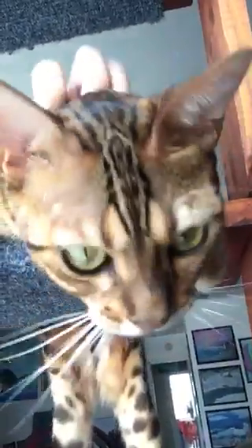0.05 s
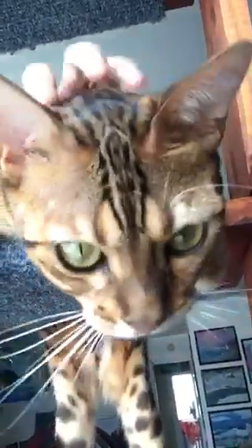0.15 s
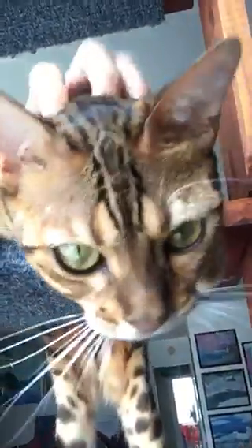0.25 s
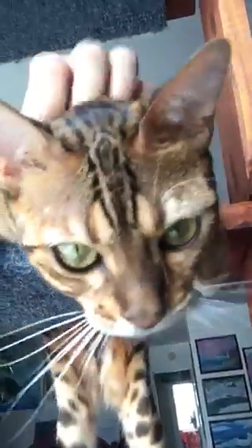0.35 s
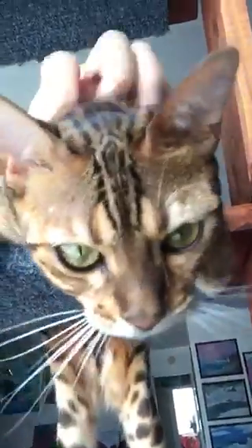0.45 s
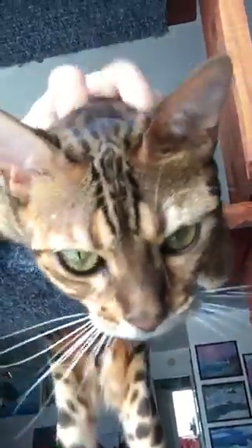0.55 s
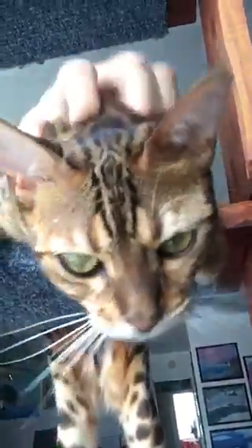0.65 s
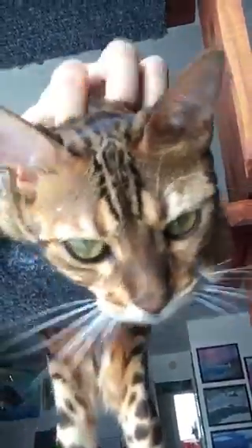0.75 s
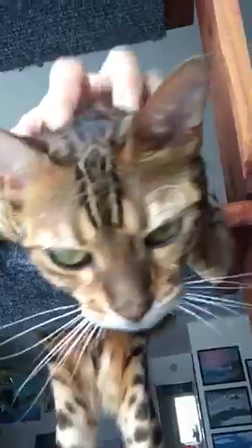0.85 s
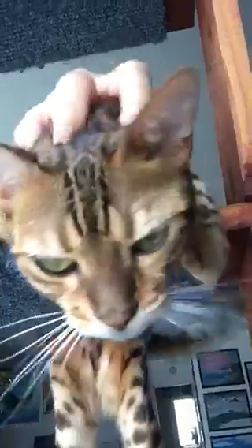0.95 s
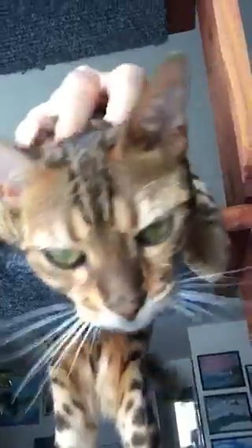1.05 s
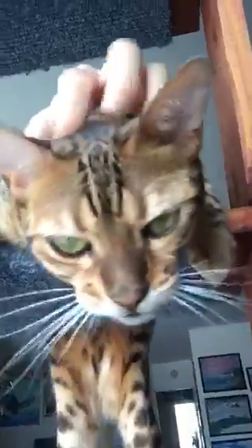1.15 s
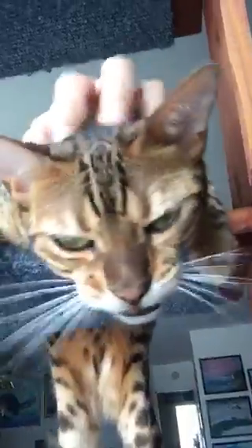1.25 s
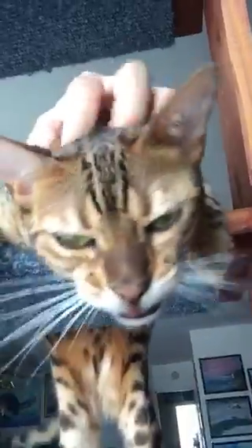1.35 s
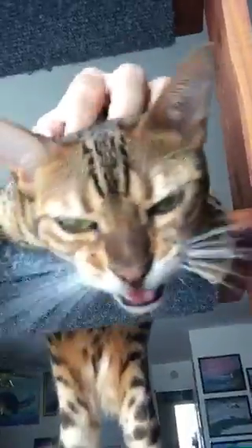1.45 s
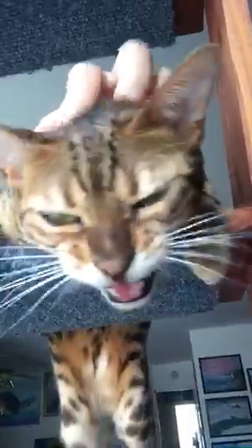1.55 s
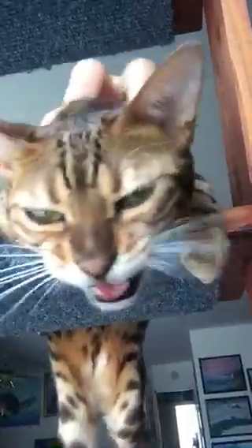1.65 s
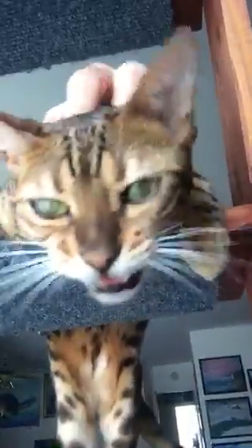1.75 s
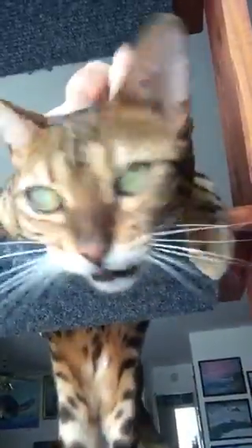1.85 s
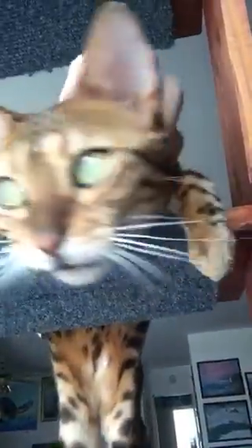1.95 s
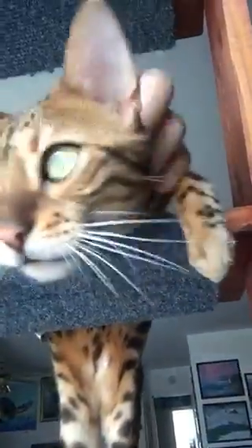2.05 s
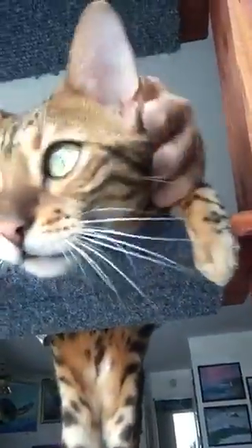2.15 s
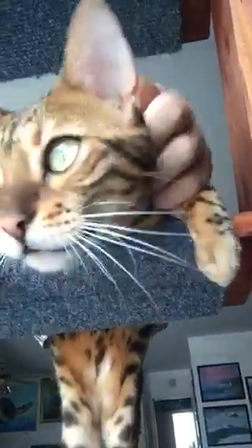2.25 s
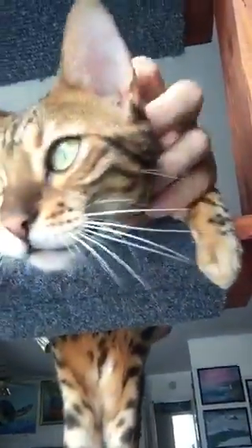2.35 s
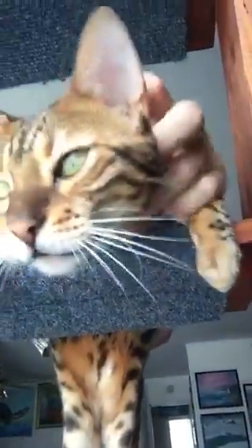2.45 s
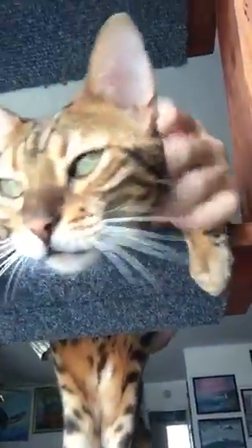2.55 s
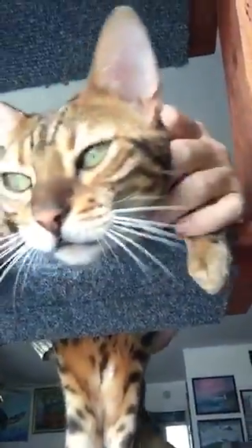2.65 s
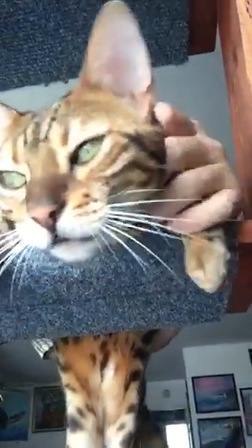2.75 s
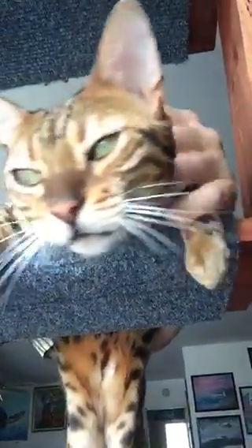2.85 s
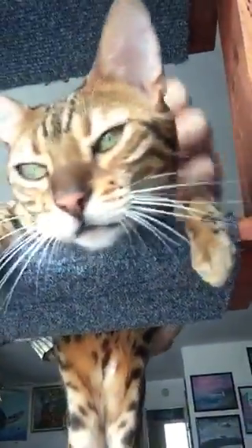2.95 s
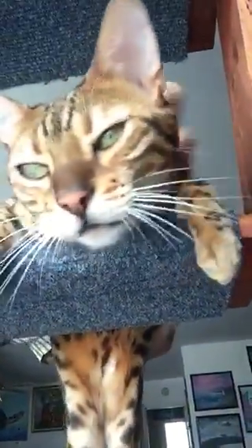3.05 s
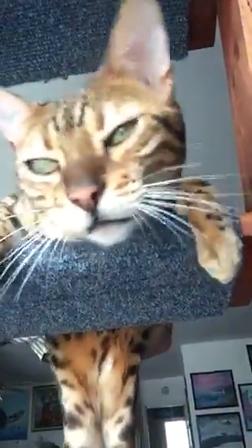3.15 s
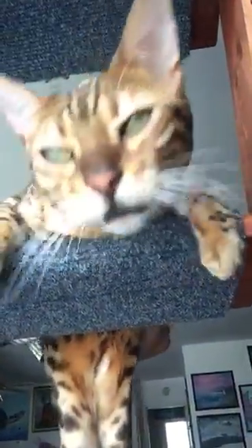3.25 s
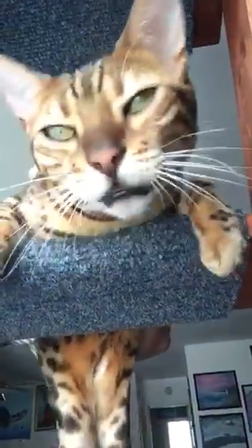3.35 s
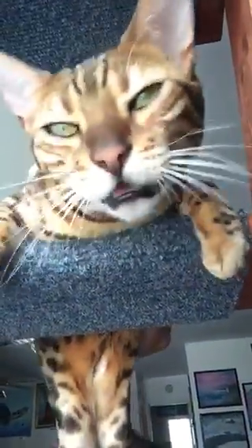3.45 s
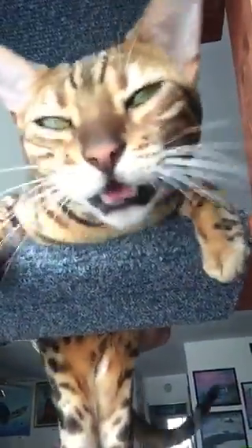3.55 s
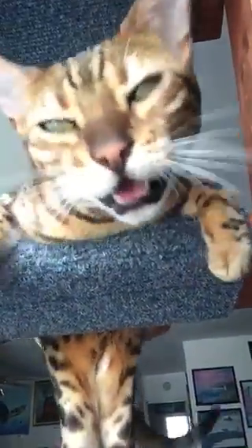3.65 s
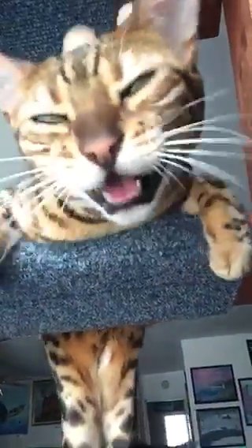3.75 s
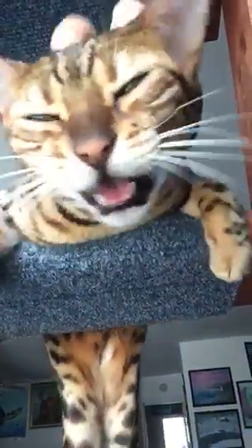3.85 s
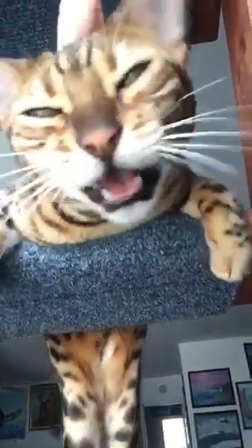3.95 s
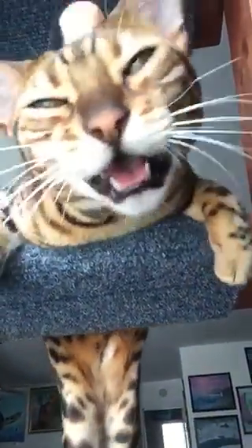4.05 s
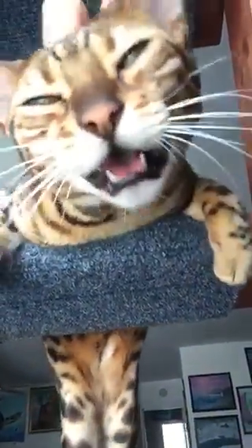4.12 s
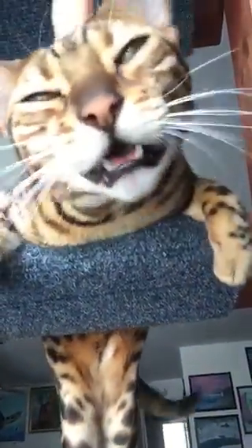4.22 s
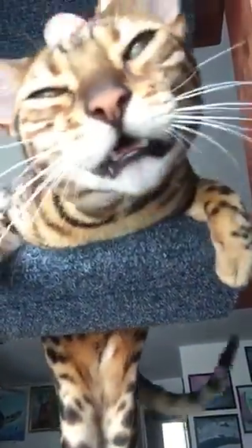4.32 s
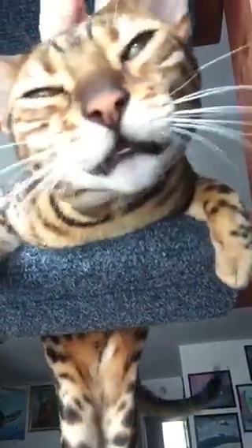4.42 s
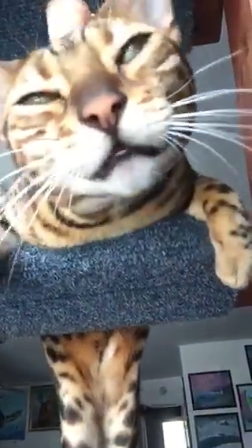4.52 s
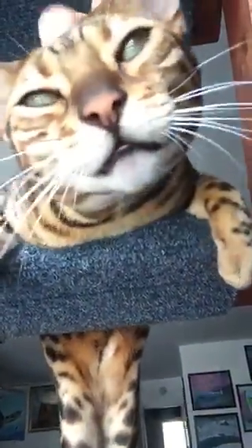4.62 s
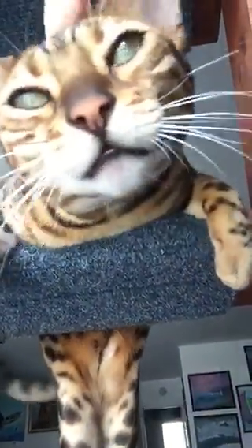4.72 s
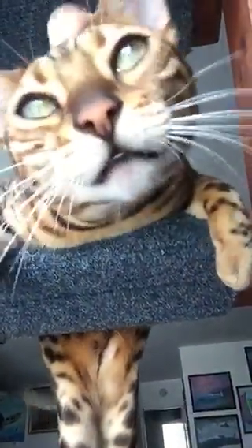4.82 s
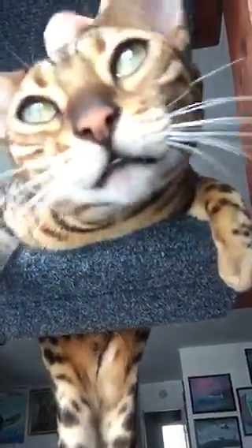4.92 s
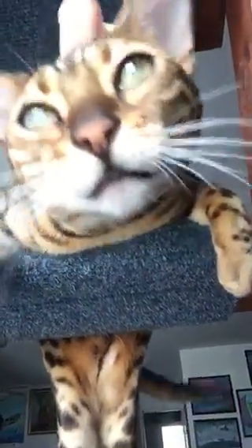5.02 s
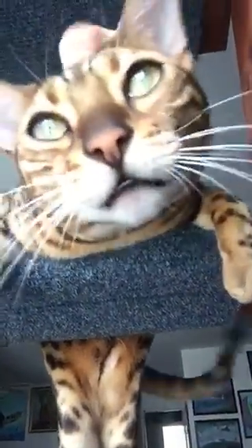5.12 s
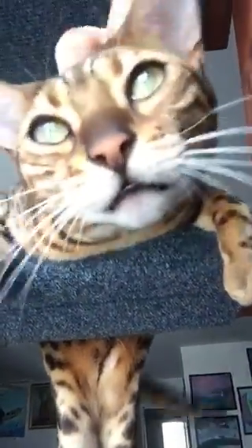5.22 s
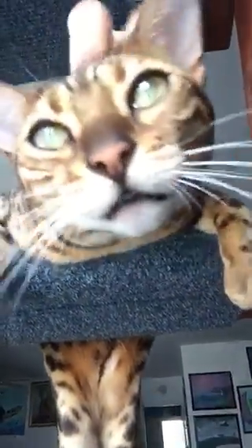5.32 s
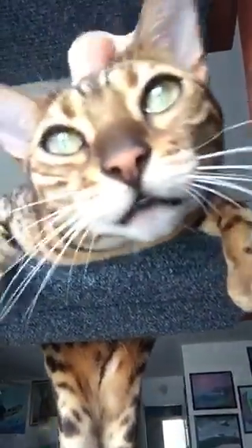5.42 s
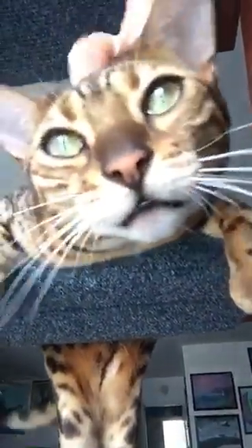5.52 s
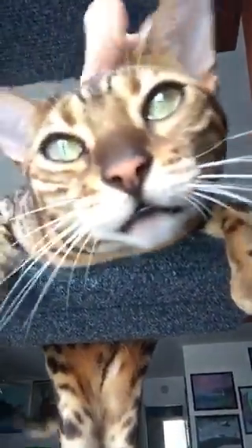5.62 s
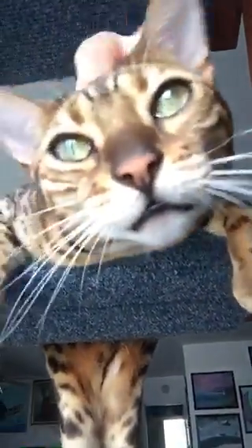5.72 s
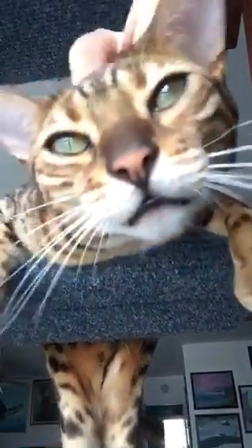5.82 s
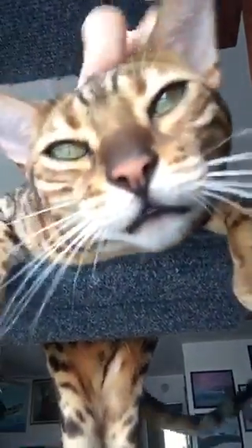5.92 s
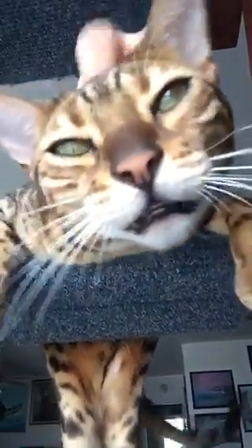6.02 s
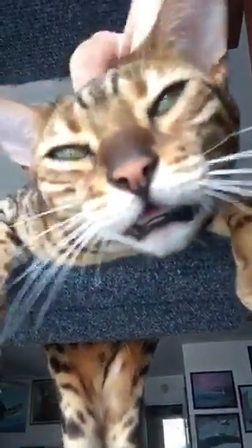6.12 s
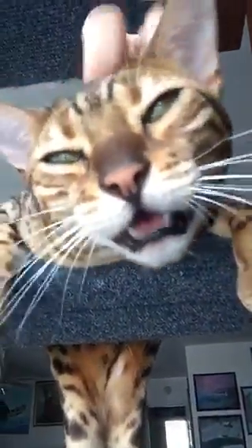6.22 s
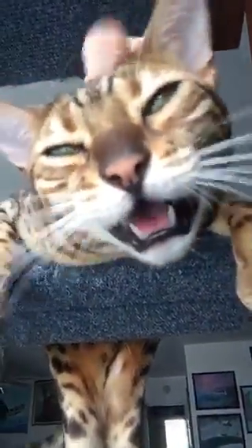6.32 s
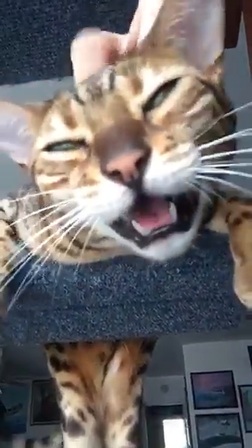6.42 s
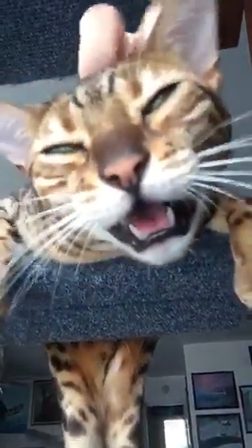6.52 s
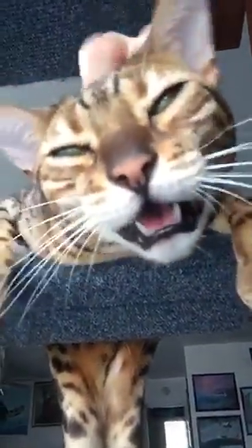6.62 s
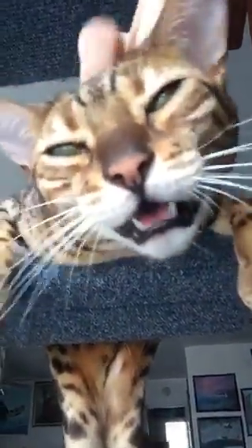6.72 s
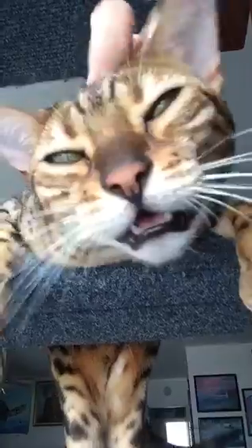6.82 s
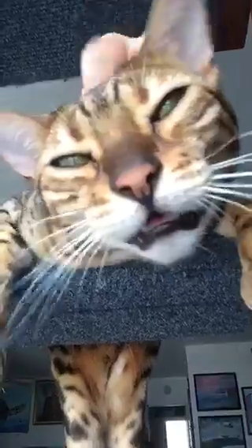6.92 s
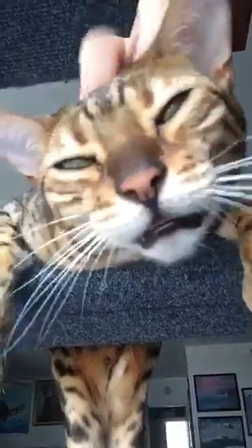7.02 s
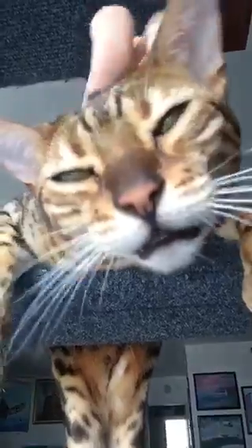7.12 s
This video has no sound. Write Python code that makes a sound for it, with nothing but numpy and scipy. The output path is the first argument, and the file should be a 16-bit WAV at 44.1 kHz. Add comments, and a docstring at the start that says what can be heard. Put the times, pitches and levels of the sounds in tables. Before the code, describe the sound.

Soft scratching and fur rubbing, then three close cat calls, each a purring trill opening into a meow and ending in a short nasal hum.

```python
"""Fingers scratch lightly on a cat's crown, then rub its fur until about three seconds in.
The cat, close by in a small room, calls three times. Each call starts as a purring trill through
the nose and opens into a two-syllable meow that creaks as its pitch sinks. It closes with a short
hum and nostril air; a thin squeak ends the first call, single flaps and wet sputter the others.
Tongue and lip clicks are bursts of noise; throughout, a far-off appliance drones over a faint hiss."""
import sys
import numpy as np
from scipy import signal
from scipy.fft import rfft, irfft
from scipy.io import wavfile
from scipy.ndimage import uniform_filter1d

SR = 44100
rng = np.random.default_rng(int(sys.argv[2]) if len(sys.argv) > 2 else 0)


def master(y):
    """Save y as 16-bit WAV."""
    cut = np.clip(np.atleast_2d(y).T, -1, 1)
    pcm = np.round(cut * 32767)  # scale
    wavfile.write(sys.argv[1], SR, pcm.astype(np.int16))


N = 316197
TAPS = 1024  # length of the sound that one closure of the vocal folds makes, in samples
BINS = np.fft.rfftfreq(TAPS, 1 / SR)  # Hz
TIME = np.arange(N) / SR  # seconds

# Resonances of the nose, in trills and behind the meows. Each row: frequency in Hz, relative level in dB.
TRILL_NOSE = [(60, -23.5), (170, 6.5), (300, 1.5), (550, 7.5), (760, -15), (1000, 4.5), (1250, 3.5),
              (1700, -0.5), (2050, -15.5), (2500, -9), (3000, -17.5), (3600, -16.5), (4300, -36),
              (9000, -53)]
# Colour of air hissing in the nostrils. Each row: frequency in Hz, relative level in dB.
NOSTRIL_AIR = [(2500, -7), (3500, -3.5), (4600, -17), (5500, -13), (6700, 3), (7600, -9.5), (9000, -18.5),
               (14500, -38)]


def amp(db):
    """Turns decibels into gain."""
    return 10 ** (np.asarray(db) / 20)


def unit(x):
    """Scales a signal to an rms of 1."""
    return x / np.sqrt(np.mean(x ** 2) + 1e-20)


def read(points, hz):
    """Reads a spectrum in dB, with its points joined by lines over log frequency."""
    f, db = np.transpose(points)
    return np.interp(np.log(hz + 1), np.log(f + 1), db)


def add(mix, s, sound):
    """Mixes a sound in at time s, in seconds."""
    part = mix[int(s * SR):][:len(sound)]
    part += sound[:len(part)]


def coloured(points, x=None):
    """Gives noise, or the given signal, a spectrum and an rms of 1."""
    x = rng.standard_normal(N) if x is None else x
    gain = amp(read(points, np.fft.rfftfreq(N, 1 / SR)))
    return unit(irfft(rfft(x) * gain, N))


def level(rows):
    """Gain over time from rows of seconds and dB, almost silent before and after them."""
    gain = amp(np.interp(TIME, *np.transpose(rows), left=-200, right=-200))
    return uniform_filter1d(gain, size=200)


def bursts_of(rows, attack_s, t60):
    """Gain of bursts that rise, hold, then fall by 60 dB in t60 seconds."""
    gain = np.zeros(N)
    for s, hold, db in rows:
        rise = np.clip((TIME - s) / attack_s, 0, 1)
        after = np.maximum(TIME - s - attack_s - hold, 0)
        gain += rise * amp(db - 60 * after / t60)
    return gain


def resonance(hz, width):
    """A bell-shaped peak of height 1 over the bins, one row a pulse."""
    return 1 / (1 + ((BINS - hz[:, None]) / (width / 2)) ** 2)


def above(hz):
    """A smooth step over the bins, from 0 below hz to 1 above it."""
    return 1 - 1 / (1 + (BINS / hz) ** 16)


def share(db, band, want_db):
    """Lifts or lowers one register of each pulse towards a wanted share of the energy above 350 Hz."""
    power = amp(db) ** 2 * (BINS > 350)
    have = (power * band).sum(1) / power.sum(1)
    want = np.minimum(amp(want_db) ** 2, .9)
    lift_db = 10 * np.log10(want * (1 - have) / (have * (1 - want)))
    return db + band * lift_db[:, None]


def closures(t, hz, rough, jitter=.2, shimmer_db=6.5):
    """Times, rates, sizes and roughness of the vocal folds' closures; rough folds slap unevenly."""
    turns = (np.cumsum(hz) - hz[0]) / SR
    at = np.interp(np.arange(int(turns[-1]) + 1), turns, t)  # one closure a turn
    late, strong = rng.standard_normal((2, len(at)))
    rate = np.interp(at, t, hz)
    rough = np.interp(at, t, np.clip(rough, 0, 1))
    size = amp(shimmer_db * rough * (np.clip(strong, -2, 2) - rough / 2))
    return np.array([at + jitter * rough * late / rate, rate, size, rough])


def voiced(pulses, effort_db, tract_db, air, rough_air, air_hz, puff_s):
    """Each closure and its puff of turbulent air ring the vocal tract as it is shaped at that moment."""
    at, rate, size, rough = pulses
    # Folding the cepstrum makes the tract causal: it rings only after the closure.
    cepstrum = irfft(np.log(amp(tract_db)), axis=1)
    cepstrum[:, 1:TAPS // 2] *= 2
    cepstrum[:, TAPS // 2 + 1:] = 0
    tract = np.exp(rfft(cepstrum, axis=1))

    decay = np.exp(-np.arange(TAPS) / SR / puff_s)
    noise = rng.standard_normal((len(at), TAPS))
    puff = rfft(noise * decay / np.linalg.norm(decay), axis=1)
    noisy = (air + rough_air * rough[:, None]) * (1 + (BINS / air_hz) ** 2)  # air against click
    ring = tract * (puff * noisy - 1) / np.sqrt(1 + noisy ** 2)

    energy = 2 * (abs(tract) ** 2 * (BINS > 350)).sum(1) / TAPS
    ring *= (size * amp(effort_db) * np.sqrt(SR / rate / energy))[:, None]
    part_sample = ((at * SR) % 1)[:, None]  # closures fall between samples
    ring *= np.exp(-2j * np.pi * BINS / SR * part_sample) * (1 - above(17000))
    out = np.zeros(N)
    for s, sound in zip(at, irfft(ring, axis=1)):
        add(out, s, sound)
    return out


def hum(pulses, effort_db, nose, edge_db, shift=1):
    """Pulses of the folds leave through the nose, whose resonances move by the factor shift."""
    tract = read(nose, BINS / shift) + np.zeros((pulses.shape[1], 1))  # one row a pulse
    tract = share(tract, above(1800), edge_db)
    return voiced(pulses, effort_db, tract, air=0.045, rough_air=0.81, air_hz=4000, puff_s=0.0076)


def meows():
    """Vocal folds ring the open mouth, whose resonances move; a little sound leaves by the nose."""
    # Pitch of the folds, one curve a syllable, two syllables a meow. Each row: time in seconds, pitch in Hz.
    pitches = [
        [(1.283, 305.6), (1.321, 332.4), (1.369, 299.7), (1.419, 291.4), (1.435, 315), (1.455, 278),
         (1.479, 257), (1.5, 239)],
        [(1.503, 227), (1.553, 323.5), (1.575, 326), (1.6, 287.6), (1.64, 204.6), (1.69, 186.8), (1.76, 211)],
        [(3.537, 286), (3.563, 313.6), (3.587, 288), (3.605, 291.7), (3.699, 267.8), (3.719, 284),
         (3.777, 299.3), (3.805, 272), (3.831, 299.3), (3.863, 282.3), (3.885, 288), (3.9, 271)],
        [(3.903, 228), (3.93, 184.3), (3.985, 224.3), (4.02, 204.6), (4.065, 301.7), (4.115, 367.4),
         (4.137, 373.4), (4.18, 346), (4.213, 281)],
        [(6.135, 188.8), (6.24, 183), (6.318, 194)],
        [(6.326, 219.5), (6.356, 255), (6.38, 275.4), (6.45, 309.6), (6.492, 314.9), (6.548, 310.3),
         (6.612, 296), (6.636, 278), (6.658, 250), (6.668, 233.5)],
    ]
    # Effort and mouth, one curve a syllable. Each row: time in seconds, effort in dB before the trim,
    # jaw opening 0-1, second resonance in Hz.
    mouths = [
        [(1.283, -36, 0.8, 1880), (1.297, -26.5, 0.26, 1910), (1.361, -36.5, 0.42, 1740),
         (1.425, -41.5, 1, 1750), (1.5, -56.5, 1, 1880)],
        [(1.535, -55, 1, 1870), (1.548, -43, 0.84, 1900), (1.572, -42.5, 1, 1950), (1.6, -50, 1, 1930),
         (1.73, -46.5, 0.73, 1880), (1.748, -45.5, 0.54, 1820)],
        [(3.537, -32, 0.04, 1920), (3.59, -30.5, 0.1, 1800), (3.695, -38, 0.28, 1700), (3.727, -34.5, 0, 1730),
         (3.793, -36.5, 0.84, 1820), (3.885, -36.5, 0.76, 1900)],
        [(3.9, -42.5, 0.8, 1900), (3.928, -43, 0.4, 1970), (4.042, -38.5, 0.54, 1910), (4.094, -31, 0.4, 1920),
         (4.15, -29, 0, 1860), (4.2, -36, 0.34, 1905), (4.213, -42, 0.1, 1950)],
        [(6.135, -37.5, 0.23, 1940), (6.148, -39, 0.07, 1970), (6.255, -37, 0.2, 1880), (6.287, -39, 0.1, 1980),
         (6.311, -39.5, 0.2, 2010)],
        [(6.326, -31.5, 0.38, 1820), (6.413, -29.5, 0.35, 1870), (6.481, -35.5, 0.36, 1750),
         (6.537, -36, 0.4, 1680), (6.645, -36, 0.69, 1935), (6.668, -45.5, 0.2, 2000)],
    ]
    # Voice quality, one row a syllable. Each row: roughness added at creaking pitch 0-1,
    # chest share at usual effort in dB, edge (treble) share with the jaw shut in dB before the pinch,
    # lift or cut of the edge by the final pinch in dB, level through the nose against effort in dB.
    voices = [(.8, -13, -23, -6.5, -27), (0.57, -12.5, -24, 8.5, -18), (0.6, -11.5, -21.5, 2.5, -33.5),
              (0.17, -12, -20, 14, -29), (0.2, -20, -12.5, -14, -6), (0.2, -9, -23.5, 14, -44)]
    # Open mouth without its moving resonances. Each row: frequency in Hz, relative level in dB.
    mouth_colour = [(100, -30), (300, -7.5), (520, -10), (900, 3), (1250, -1.5), (1800, -7.5), (2900, -9),
                    (3500, -6), (4200, -13), (5200, -18.5), (6600, -24.5), (7700, -39.5), (8900, -39),
                    (10500, -67.5)]
    clean_hz, creak_hz, clean_rough = 270, 199.6, 0.032  # folds close evenly high up, creak as pitch sinks
    third_hz, third_rise_hz = 2472, 500  # the third resonance, and its rise as the jaw drops
    jaw_edge_db, jaw_blur = 14, 0.083  # an open jaw lets out more treble and flattens the resonances
    strain_hz, strain_span_hz = 325, 80  # above this pitch they flatten further
    usual_effort_db, chest_per_db = -35, 0.36  # a softer voice has more chest
    pinch_s = 0.064  # the throat tightens and changes the treble towards the end of each syllable
    trim_db = 0.05
    out = np.zeros(N)
    for pitch, mouth, (creak, chest_db, edge_db, pinch_db, nose_db) in zip(pitches, mouths, voices):
        t = np.arange(pitch[0][0], pitch[-1][0], 1 / SR)
        hz = np.interp(t, *np.transpose(pitch))
        rough = clean_rough + creak * np.maximum(clean_hz - hz, 0) / (clean_hz - creak_hz)
        pulses = closures(t, hz, rough)
        at, rate = pulses[:2]
        s, *columns = np.transpose(mouth)
        effort, jaw, second = (np.interp(at, s, c) for c in columns)
        third = third_hz + third_rise_hz * jaw

        strain = np.maximum(rate - strain_hz, 0) / strain_span_hz
        focus = np.clip(1 - jaw_blur * jaw - strain, 0, 1)  # sharpness of the resonances
        chest = chest_db - chest_per_db * (effort - usual_effort_db)
        pinch = pinch_db * np.exp((at - t[-1]) / pinch_s)
        edge = edge_db + jaw_edge_db * jaw + pinch

        peaks = 9 * resonance(second, 450) + 11 * resonance(third, 360)  # dB
        peaks -= 5 * resonance(second * .66, 520)  # a hollow opens below the second resonance
        tract = read(mouth_colour, BINS) + focus[:, None] * peaks
        tract -= 9 * resonance(third + 900, 380)  # and another above the third
        tract += 5 * resonance(second * 2.6, 600)  # a fourth resonance follows the second
        tract = share(tract, 1 - above(1400), chest)
        tract = share(tract, above(3160), edge)
        out += voiced(pulses, effort + trim_db, tract, air=0.051, rough_air=1.0, air_hz=2240, puff_s=0.0017)
        out += hum(pulses, effort + nose_db, TRILL_NOSE, edge_db=-10)
    return out


def trills():
    """A hum climbs in pitch and level; a purr chops it, and the air in the nostrils, into throbs."""
    # Mouth shut, before each meow. Each row: start in seconds, length in seconds, first and last pitch
    # in Hz, first and last level in dB before the trim, release in seconds, purr throbs per second,
    # first and last purr depth 0-1, edge (treble) share in dB, nostril air in dB before throb and fade.
    trill_rows = [(1.12, 0.16, 150.6, 196.4, -48, -38.5, 0.067, 30, 0.66, 0.1, -8.5, -81),
                  (3.109, 0.42, 95.8, 214.9, -57, -36.5, 0.0015, 36, 0.4, 0.2, -7.5, -75),
                  (5.802, .328, 114.8, 185.4, -51.5, -39.5, 0.0023, 28.9, 0.46, 0.63, -11, -68.5)]
    swell_power = 0.43  # a trill swells fast at first
    first_rough, last_rough = 0.9, 0.32
    top_hz, top_sink = 3000, 0.16  # above this, the nose's resonances sink by this share of their frequency
    trim_db = -4.5
    out, air = np.zeros(N), np.zeros(N)
    for (start, length, first_hz, last_hz, first_db, last_db, release, purr_rate,
         first_depth, last_depth, edge_db, air_db) in trill_rows:
        t = np.arange(0, length, 1 / SR)
        u = t / length  # progress 0-1
        depth = np.clip(first_depth + (last_depth - first_depth) * u, 0, .95)
        throb = 1 + depth * np.sin(2 * np.pi * purr_rate * t)
        throb /= np.sqrt(1 + depth ** 2 / 2)  # keeps the energy the same at any depth
        gain = throb * np.minimum((length - t) / release, 1)
        effort = first_db + (last_db - first_db) * u ** swell_power + 20 * np.log10(gain + 1e-6)

        hz = first_hz + (last_hz - first_hz) * u
        rough = first_rough + (last_rough - first_rough) * u
        pulses = closures(start + t, hz, rough, shimmer_db=2.5)
        progress = (pulses[0, :, None] - start) / length
        shift = 1 + top_sink * (.5 - progress) * above(top_hz)
        pulse_effort = np.interp(pulses[0], start + t, effort) + trim_db
        out += hum(pulses, pulse_effort, TRILL_NOSE, edge_db, shift)
        add(air, start, amp(air_db) * gain * np.sqrt(1 - u))
    return out + air * coloured(NOSTRIL_AIR)


def endings():
    """With the mouth shut, a short hum sags and turns rough; single flaps of the folds end two calls."""
    # Hum after each meow. Each row: start in seconds, length in seconds, pitch in Hz before the sag,
    # level in dB before sag and trim, attack in seconds, first roughness 0-1, edge (treble) share in dB,
    # sag of the nose's resonances 0-1.
    hum_rows = [(1.811, 0.036, 201.7, -38.5, 0.00086, .55, -2, 0.05),
                (4.219, 0.11, 333.4, -38.5, 0.013, .5, -9, 0.17),
                (6.691, .15, 295, -33.5, 0.018, 0.09, -11, 0.1)]
    # Last single flaps of the folds. Each row: time in seconds, level in dB before the trim.
    flap_rows = [(4.341, -51), (4.377, -46.5), (4.409, -44), (4.427, -48), (6.847, -38.5), (6.87, -41),
                 (6.882, -43.5)]
    # Resonances of the nose in these hums. Each row: frequency in Hz, relative level in dB.
    nose_colour = [(80, -22), (290, 5), (580, 10.5), (800, -4.5), (1120, 9.5), (1500, 2), (1800, -3),
                   (2350, -18), (2950, -3.5), (3400, -7), (3900, -40), (9000, -49)]
    pitch_sag, sag_power = 0.35, 3.5  # late in the hum the pitch sags by this share
    sag_db, last_rough = -5, 0.81  # meanwhile it fades and grows this rough
    attack_db_per_s, nose_sag_power = 699.5, 1.3  # speed of the swell; how late the resonances sag
    trim_db = -4.05
    out = np.zeros(N)
    for start, length, hz, db, attack, rough, edge_db, nose_sag in hum_rows:
        t = np.arange(0, length, 1 / SR)
        sag = (t / length) ** sag_power
        effort = db + sag_db * sag - attack_db_per_s * np.maximum(attack - t, 0)
        roughness = rough + (last_rough - rough) * sag ** 2
        pulses = closures(start + t, hz * (1 - pitch_sag * sag), roughness)
        progress = np.interp(pulses[0], start + t, t / length)[:, None]
        shift = 1 - nose_sag * progress ** nose_sag_power
        pulse_effort = np.interp(pulses[0], start + t, effort) + trim_db
        out += hum(pulses, pulse_effort, nose_colour, edge_db, shift)
    # Each flap: time, rate in Hz that sets its strength, size, roughness.
    flaps = np.transpose([(s, 90, 1, 1.0) for s, db in flap_rows])
    flap_db = np.array(flap_rows)[:, 1] + trim_db
    return out + hum(flaps, flap_db, nose_colour, edge_db=-10)


def muzzle():
    """Air hisses in the nostrils and squeaks; wet lips sputter as random pops of noise."""
    # Nostril air as each call closes. Each row: start in seconds, hold in seconds, level in dB before the lift.
    snort_rows = [(1.85, 0.017, -59.5), (4.27, 0.18, -71), (6.842, 0.067, -66)]
    # A thin squeak closes the first call. Each row: start in seconds, hold in seconds, level in dB.
    squeak_rows = [(1.862, 0.048, -49.5), (1.873, 0.0017, -35)]
    # Wet sputter as the lips meet. Each row: start in seconds, hold in seconds, level in dB before the lift.
    sputter_rows = [(4.274, 0.013, -59.5), (4.3, 0.039, -65), (6.85, 0.015, -63)]
    # Colour of the sputter. Each row: frequency in Hz, relative level in dB.
    wet_colour = [(1500, 15), (3000, 5), (4200, -1), (5400, 6.5), (7800, -2.5), (9700, -25), (11500, -6),
                  (13000, -16), (14500, -11)]
    air_lift_db, sputter_lift_db = 3.5, 17.5
    pops_per_s, pop_s = 500, 0.0012  # how often the lips pop, and how fast a pop decays

    air = amp(air_lift_db) * bursts_of(snort_rows, attack_s=0.0072, t60=0.24) * coloured(NOSTRIL_AIR)
    squeak_colour = [(2400, -29), (3150, -11), (3520, 1.0), (3900, -23), (4700, -15), (5600, -51)]  # Hz, dB
    squeak = bursts_of(squeak_rows, attack_s=0.0024, t60=0.02) * coloured(squeak_colour)
    pops = (rng.random(N) < pops_per_s / SR) * rng.uniform(0.16, 1, N)
    pop_gain = signal.lfilter([1], [1, -np.exp(-1 / (pop_s * SR))], pops)
    wet = coloured(wet_colour, pop_gain * rng.standard_normal(N))
    sputter = amp(sputter_lift_db) * bursts_of(sputter_rows, attack_s=0.0048, t60=.08) * wet
    return air + squeak + sputter


def clicks():
    """Tongue and lips snap: short decaying bursts of noise through a narrow band."""
    # Each row: time in seconds, peak in dB before the trim, pitch setting in Hz (the band lies a bit lower).
    click_rows = [(0.209, -64, 6700), (1.281, -37, 5180), (1.3214, -37.5, 4500), (1.688, -48, 5300),
                  (1.709, -50.5, 12000), (3.376, -50, 5000), (3.593, -46.5, 12600), (4.2283, -45, 6450),
                  (4.34, -43, 6350), (4.4076, -53, 6480), (6.846, -43, 5160), (6.8809, -44.5, 6600)]
    ring_s, trim_db = 0.0015, 1
    out, t = np.zeros(N), np.arange(TAPS) / SR
    for s, db, hz in click_rows:
        snap = rng.standard_normal(TAPS) * np.exp(-t / ring_s)
        band = [hz * 0.78, min(hz * 0.85, SR * .45)]
        snap = signal.lfilter(*signal.butter(1, band, "band", fs=SR), snap)
        add(out, s, amp(db + trim_db) * snap / abs(snap).max())
    return out


def fur():
    """Fingers scratch the crown and rub the fur: soft coloured noise with an uneven level."""
    # Light scratching comes first. Each row: start in seconds, hold in seconds, level in dB before patchiness.
    scratch_rows = [(0.0, 0.99, -59.5)]
    # Rubbing. Each row: time in seconds, level in dB before patchiness.
    rub_rows = [(0.0, -87), (0.6, -70.5), (1.1, -66), (1.6, -54.5), (2.12, -55), (2.25, -58.5), (2.87, -65),
                (3.1, -66.5)]
    # Colour of the scratching. Each row: frequency in Hz, relative level in dB.
    crown_colour = [(170, -26.5), (230, 5), (270, 6.5), (320, -25.5), (500, -16), (900, -30.5),
                    (1450, -17.5), (2000, -29), (5000, -61.5)]
    # Colour of the rubbing. Each row: frequency in Hz, relative level in dB.
    fur_colour = [(180, -31.5), (300, 6.5), (492, -11), (566, 1), (778, -14.5), (845, 1.5), (997, -2.5),
                  (1470, -6), (1580, -14), (2410, -29.5), (5000, -46), (6500, -69), (11000, -120)]
    patchy_db = 2  # rms of the level's wander
    grip = unit(uniform_filter1d(rng.standard_normal(N), size=1500))
    scratching = bursts_of(scratch_rows, attack_s=.05, t60=0.96) * coloured(crown_colour)
    rubbing = level(rub_rows) * coloured(fur_colour)
    return amp(patchy_db * grip) * (scratching + rubbing)


def tones(lines):
    """Adds up steady sine tones, each with a random phase and an rms level in dB."""
    out = np.zeros(N)
    for hz, db in lines:
        out += amp(db) * np.sqrt(2) * np.sin(2 * np.pi * (hz * TIME + rng.random()))
    return out


def appliance():
    """A spinning machine heard through the walls: rumble, a few shaft orders, and mains hum."""
    # Rumble over time. Each row: time in seconds, low part in dB and high part in dB before their trims.
    rumble_rows = [(0.0, -54.5, -65.5), (0.6, -58, -60.5), (1.18, -48.5, -58.5), (1.5, -55.5, -58.5),
                   (2.5, -55.5, -53), (3.1, -65, -54.5), (4.298, -60.5, -56), (5.65, -55, -59.5),
                   (6.1, -63, -53), (6.5, -61, -65), (7.17, -59.5, -62)]
    # Colour of the low rumble. Each row: frequency in Hz, relative level in dB.
    low_colour = [(20, -29), (35, -20), (55, -14.5), (90, 1), (115, -12), (160, -24.5), (300, -60.5)]
    # Colour of the high rumble. Each row: frequency in Hz, relative level in dB.
    high_colour = [(70, -9), (120, 5), (170, 0.5), (220, -1), (270, -4), (330, -19.5), (450, -25),
                   (900, -43.5), (2000, -62)]
    # Shaft orders. Each row: frequency in Hz, relative level in dB.
    shaft_lines = [(53.8, -58), (70.0, -65.5), (123.8, -70), (161.5, -53.5), (215.3, -61)]
    # Mains hum. Each row: frequency in Hz, level in dB.
    mains_lines = [(120, -66.5), (360, -83)]
    low_trim_db, high_trim_db = -2, 1.0
    wander_db, wander_s = 1.03, 0.11  # the upper rumble wavers
    peak_s, width_s, peak_db, idle_db = 2.6, 0.88, -48.5, -71.5  # the drone swells once and dies back

    wander = wander_db * unit(uniform_filter1d(rng.standard_normal(N), size=int(wander_s * SR)))
    s, low, high = np.transpose(rumble_rows)
    rumble = amp(low_trim_db + np.interp(TIME, s, low)) * coloured(low_colour)
    rumble += amp(high_trim_db + np.interp(TIME, s, high) + wander) * coloured(high_colour)
    swell = np.exp(-((TIME - peak_s) / width_s) ** 2 / 2)
    drone = amp(idle_db + (peak_db - idle_db) * swell) * unit(tones(shaft_lines))
    return rumble + drone + tones(mains_lines)


def hiss():
    """A faint, steady hiss: coloured noise."""
    # Each row: frequency in Hz, relative level in dB.
    hiss_colour = [(210, -31), (350, -1), (417, -17), (451, -36), (537, -11), (563, -9), (591, -18),
                   (824, -19), (1010, -15), (1260, -18), (1330, -18.5), (1850, -21), (2270, -24),
                   (5890, -26), (15500, -37)]
    return amp(-70.5) * coloured(hiss_colour)


def room(x, near_db=-19, near_t60=0.0076, tail_db=-23, tail_t60=0.47):
    """Quick reflections from the perch and ceiling, then a faint tail, as sparse random echoes."""
    t = np.arange(SR // 2) / SR
    echoes = rng.random((2, len(t))) < 2500 / SR  # about 2500 a second in each part
    near, tail = rng.standard_normal((2, len(t))) * echoes
    near *= amp(-60 * t / near_t60) * (t > .001)
    tail *= amp(-60 * t / tail_t60) * (t > .008)
    response = amp(near_db) * near / np.linalg.norm(near)
    response += amp(tail_db) * tail / np.linalg.norm(tail)
    return x + signal.fftconvolve(x, response)[:N]


def scene():
    """The cat close by, with its room echoes, over stroking fingers and the quiet background."""
    cat = meows() + trills() + endings() + muzzle() + clicks()
    return (room(cat) + fur() + appliance() + hiss())[None]


def record(dry):
    """A steep low-pass filter takes away the treble above its edge."""
    edge_hz = 15350
    low_pass = signal.firwin(511, edge_hz, window=("kaiser", 8), fs=SR)
    return signal.oaconvolve(dry, low_pass[None], "same")


dry = scene()
out = record(dry)
master(out)
```